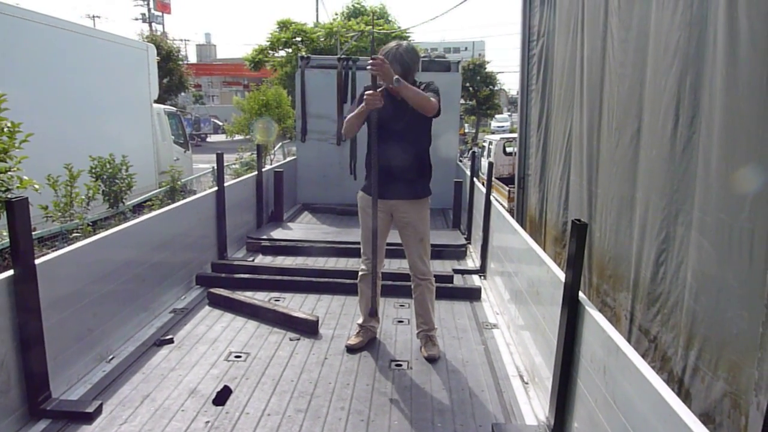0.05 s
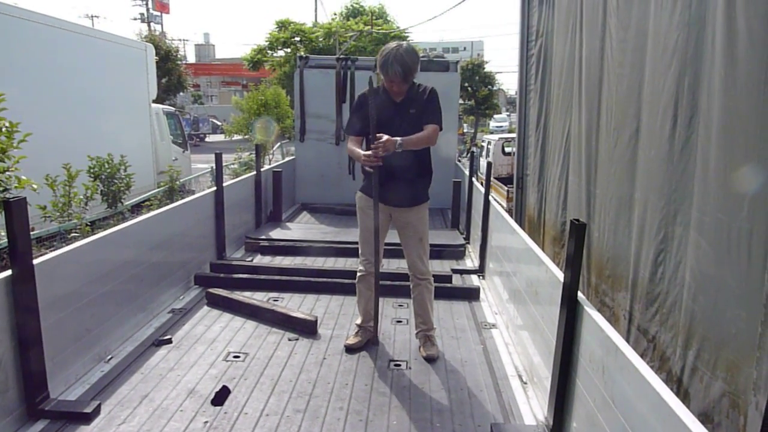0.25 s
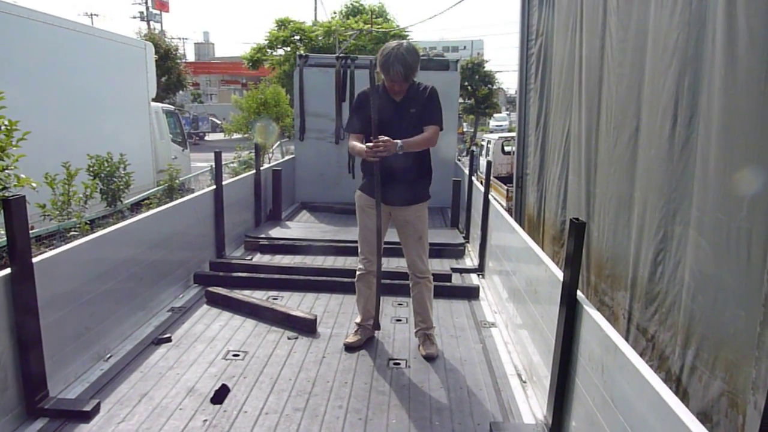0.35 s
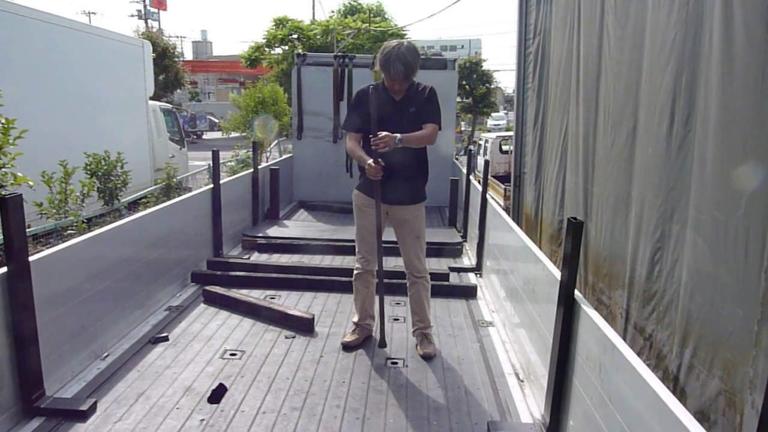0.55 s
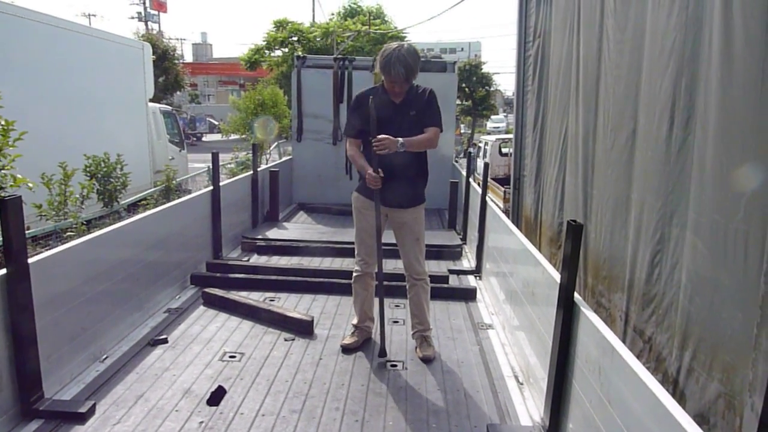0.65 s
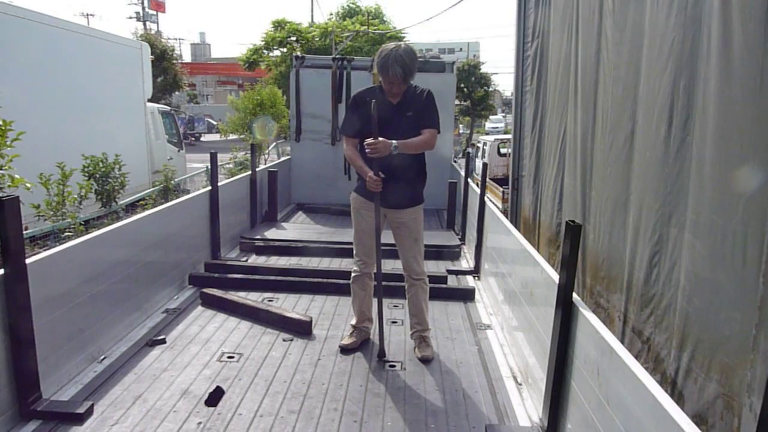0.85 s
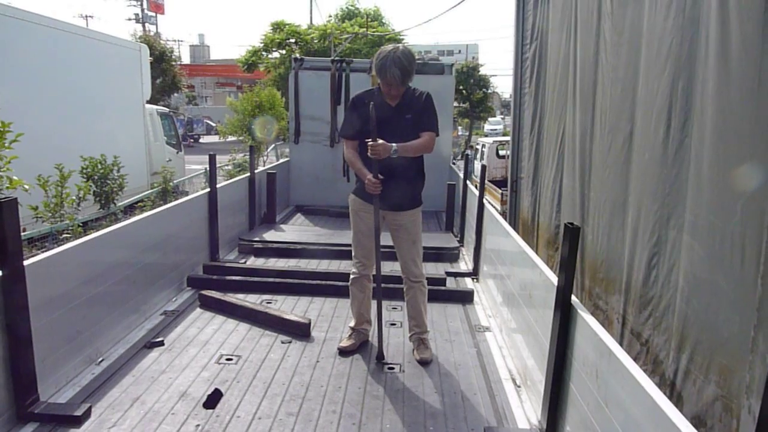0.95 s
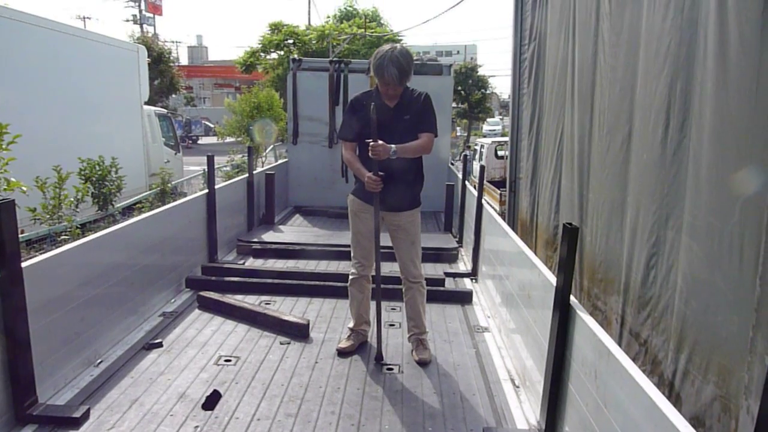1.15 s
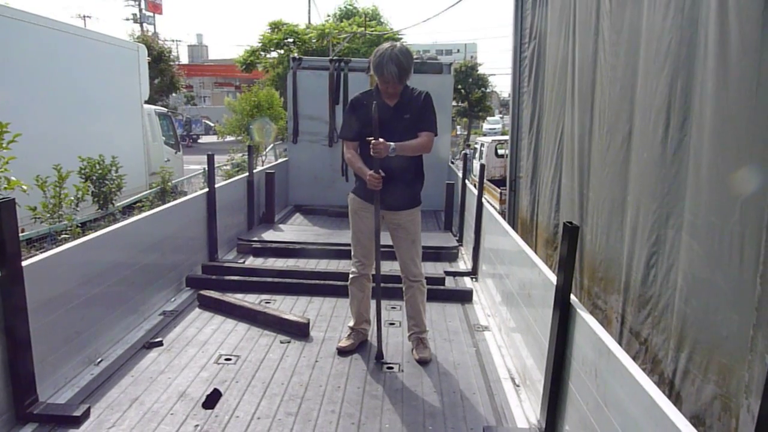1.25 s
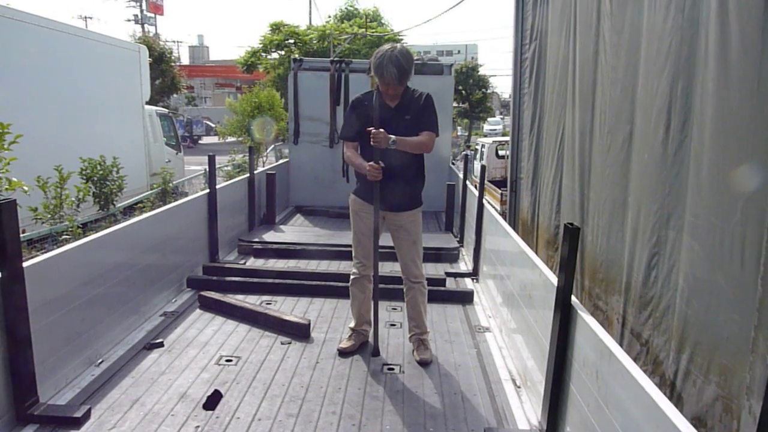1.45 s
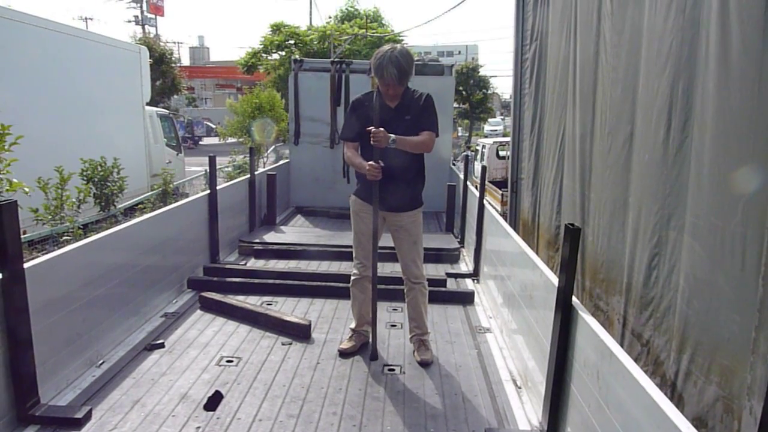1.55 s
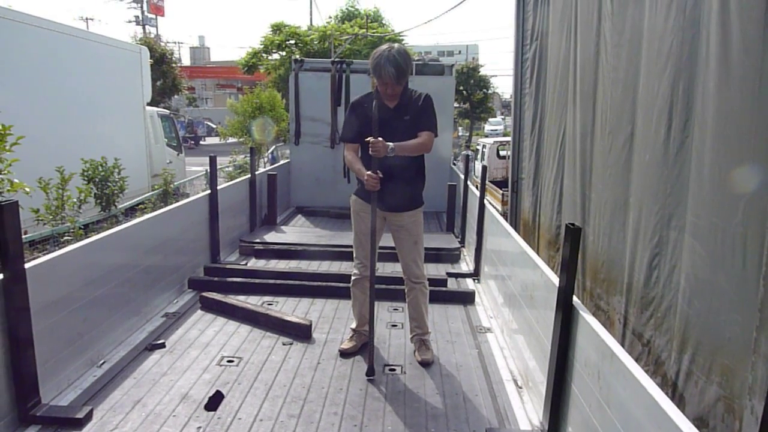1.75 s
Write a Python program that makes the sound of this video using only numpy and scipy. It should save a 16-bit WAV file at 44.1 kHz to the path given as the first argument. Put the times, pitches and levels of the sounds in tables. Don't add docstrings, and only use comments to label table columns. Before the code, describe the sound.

A steel bar is dropped on end onto an empty truck bed: a hard, booming clang, a heavier second hit, a lighter last touch, then short ringing over faint town hum outdoors, overloaded at the microphone.

```python
import sys
import numpy as np
from scipy import signal
from scipy.io import wavfile

SR = 44100
rng = np.random.default_rng(int(sys.argv[2]) if len(sys.argv) > 2 else 0)


def to_linear_factor(level_db):
    exponent = np.asarray(level_db, float) / 20
    return 10 ** exponent


def file_out(sig):
    cols = np.atleast_2d(sig).T
    lim = np.clip(cols, -1, 1)
    pcm = np.round(lim * 32767).astype(np.int16)
    wavfile.write(sys.argv[1], SR, pcm)


N = 79380
T_S = np.arange(N) / SR
LEFT_RIGHT_HALF = np.array([[0.5], [-0.5]])


def at_hz(points, hz):
    table_hz, value = np.array(points).T
    return np.interp(np.log(hz), np.log(table_hz), value)


def rms_one(x):
    return x / np.sqrt(np.mean(x ** 2) + 1e-20)


def drift(rate):
    r = np.exp(-80 * np.pi * rate / SR)
    noise = rng.standard_normal(N // 40 + 2002)
    slow = signal.lfilter([1], [1, -2 * r, r * r], noise)[2000:]
    return np.interp(np.arange(N) / 40, np.arange(len(slow)), rms_one(slow))


def ring(strike, hz, t60_s):
    r = to_linear_factor(-60 / (t60_s * SR))
    w = 2 * np.pi * hz / SR
    return signal.lfilter([0, np.sin(w)], [1, -2 * r * np.cos(w), r * r], strike + 1e-18)


def clicks(times_s, gains):
    out = np.zeros(np.shape(gains)[:-1] + (N,))
    out[..., (np.asarray(times_s) * SR).astype(int)] = gains
    return out


# (frequency [Hz], side over mid [dB])
SIDE_DB = [(60, -34), (100, -28.5), (180, -31), (310, -29.5), (530, -22), (910, -16), (1570, -8.5),
           (2700, -3), (4650, -3), (8010, 3.5)]
# (frequency [Hz], left over right [dB])
PAN = [(60, 1.5), (100, 1.0), (180, 1.0), (310, 1), (530, 0.5), (910, 1), (1570, 0.5), (2700, 0.5),
       (4650, 0.5), (8010, -2.5)]


def bands(spectrum, patchy_db, shape):
    out = 0
    together = drift(14)
    edges_hz = 25 * 2 ** np.arange(0, 8.7, 1 / 3)
    white = rng.standard_normal((2, 2, N + SR // 4))
    for k, (low, high) in enumerate(zip(edges_hz, edges_hz[1:])):
        band = signal.butter(2, [low, high], "band", fs=SR, output="sos")
        mid, side = signal.sosfilt(band, white[k % 2])[:, -N:]
        hz = np.sqrt(low * high)
        flicker_db = patchy_db * (0.5 * together + drift(12))
        gain = to_linear_factor(at_hz(spectrum, hz) + flicker_db) * shape(hz)
        both = mid + to_linear_factor(at_hz(SIDE_DB, hz)) * side * [[1], [-1]]
        out = out + gain * both * to_linear_factor(at_hz(PAN, hz) * LEFT_RIGHT_HALF)
    return out


# (frequency [Hz], density [dB per Hz])
TOWN = [(15, -48), (25, -4.5), (147, -1.5), (406, -6), (692, -12), (995, -15), (1400, -24), (6750, -39.5),
        (8200, -44), (10700, -84.5), (18000, -120)]
TOWN_DB, TOWN_PATCHY_DB = -42.5, 0.9
WHINE_HZ, WHINE_WANDER_HZ, WHINE_DB = 975, 1.9, -54


def town():
    whine_hz = WHINE_HZ + WHINE_WANDER_HZ * drift(8)
    whine = np.sin(2 * np.pi * np.cumsum(whine_hz) / SR) * to_linear_factor(2 * drift(12))
    hum = rms_one(bands(TOWN, TOWN_PATCHY_DB, lambda hz: 1))
    return to_linear_factor(TOWN_DB) * hum + to_linear_factor(WHINE_DB) * whine


# (time [s], thump [dB], knock [dB], deck roar [dB], roar tilt [dB per octave])
BLOWS = [
    (.2251, 4.5, 6.5, 4.5, 0.3),
    (0.6476, 8, -5, 6, -1.15),
    (.7925, 0, -5, 0.5, -2.15),
]
# (frequency [Hz], first blow [dB], later blows [dB], t60 [s])
THUMP = [(250, -1.7, 2, 0.045), (140, -32, -26, 0.042), (456.4, -22, -6, 0.11), (299, -4.5, -38, 0.1)]
CONTACT_S, SWING_S, FIRST_BULGE = 0.0003, 0.0016, 0.14


def thump():
    s, thump_db = np.transpose(BLOWS)[:2]
    r = np.exp(-1 / (CONTACT_S * SR))
    out = 0
    for hz, first_db, later_db, t60_s in THUMP:
        gain = to_linear_factor(thump_db + [first_db, later_db, later_db])
        push = clicks(s, FIRST_BULGE * gain) - clicks(s + SWING_S, gain)
        soft_push = signal.lfilter([(1 - r) ** 2], [1, -2 * r, r * r], push)
        out = out + ring(soft_push, hz, t60_s)
    return out


# (frequency [Hz], first blow [dB], later blows [dB], t60 [s])
KNOCK = [(837, -1.5, -10.5, 0.042), (1032, -3, -16.5, 0.048), (1814, -15.5, -3, 0.027),
         (2079, -12.5, -7, 0.082), (2885, -1, -3.5, 0.014), (3447, -7, -15.5, 0.023),
         (4530, -20, -23, 0.025), (6200, -31.5, -19.5, 0.015)]
TIP_S, KNOCK_SWAY_DB = 0.0021, 0.95


def knock():
    s, _, knock_db = np.transpose(BLOWS)[:3]
    sway = to_linear_factor(rng.normal(0, KNOCK_SWAY_DB, (len(KNOCK), 2, 1)))
    out = 0
    for gain, (hz, first_db, later_db, t60_s) in zip(sway, KNOCK):
        mode_db = np.array([first_db, later_db, later_db])
        strike = -clicks(s + TIP_S, to_linear_factor(knock_db + mode_db - 6))
        out = out + gain * ring(strike, hz, t60_s)
    return out


# (delay [s], level [dB])
ECHOES = [(.0047, -21), (.0098, -15), (.0125, -6)]


def impact():
    direct = thump() + knock()
    out = direct
    for k, (lag_s, db) in enumerate(ECHOES):
        echo = np.roll(direct, int(lag_s * SR), axis=1)
        out = out + to_linear_factor(db) * echo[::(-1) ** k]
    return out


# (frequency [Hz], density [dB per Hz])
ROAR = [(24, -46), (40, -9.5), (182, 1), (363, -1), (496, -7.5), (1260, -13.5), (5020, -31.5),
        (5370, -33.5), (8200, -45.5), (10700, -91.5), (18000, -120)]
# (frequency [Hz], t60 [s])
ROAR_T60 = [(60, 0.89), (200, 0.6), (600, 0.61), (1500, 0.53), (4000, 0.52), (8000, 0.55)]
ROAR_DB, ROAR_PATCHY_DB = 14, 1.6
ROAR_RISE_S, ROAR_RISE_CYCLES = 0.002, 1


def deck():
    def shape(hz):
        power = np.zeros(N)
        rise_s = ROAR_RISE_S + ROAR_RISE_CYCLES / hz
        for s, _, _, db, tilt_db in BLOWS:
            t = np.maximum(T_S - s - SWING_S, 0)
            fall_db = 60 * t / at_hz(ROAR_T60, hz)
            level = to_linear_factor(db + tilt_db * np.log2(hz / 250) - fall_db)
            power += (level * (1 - np.exp(-t / rise_s))) ** 2
        return np.sqrt(power)
    return to_linear_factor(ROAR_DB) * bands(ROAR, ROAR_PATCHY_DB, shape)


TWIN_DB, TWIN_T60_SHARE, RING_SPREAD_DB = -1.5, 0.88, 4


def ringing(pitches_hz, modes):
    out = np.zeros((2, N))
    s = np.transpose(BLOWS)[0] + TIP_S
    for hz, (*blows_db, t60_s, beat_hz) in zip(pitches_hz, modes):
        strike = clicks(s, to_linear_factor(blows_db))
        lean_db = at_hz(PAN, hz) + RING_SPREAD_DB * rng.normal(0, 1, 2)
        lean = to_linear_factor(lean_db * LEFT_RIGHT_HALF)
        main = ring(strike, hz, t60_s)
        twin = to_linear_factor(TWIN_DB) * ring(strike, hz + beat_hz, t60_s * TWIN_T60_SHARE)
        out += lean[:, :1] * main - lean[:, 1:] * twin
    return out


def damped(start_s, db_per_s):
    return to_linear_factor(-db_per_s * np.maximum(T_S - start_s, 0))


POSTS_HZ = [1798, 1895, 3666, 4186, 1486, 1357, 2126, 3370, 4560, 5264, 2658, 2837]
# (first blow [dB], second blow [dB], third touch [dB], t60 [s], beat [Hz])
POSTS = [(-48, -18, -22, 0.48, 3.6), (-42, -21.5, -21.5, .42, 4.4), (-46.5, -21.5, -25.5, 0.45, 3.2),
         (-38, -49, -20, 0.25, 2), (-36, -44, -44.5, 0.23, 2.2), (-45, -35.5, -46, 0.26, 4),
         (-40.5, -45, -44, 0.98, 3.7), (-41.5, -39, -30, 0.53, 3), (-45, -51.5, -65.5, 0.86, 2.6),
         (-25, -54, -64.5, .28, 2), (-50, -38, -54, 0.49, 4.8), (-49, -51, -62.5, 0.69, 3.5)]
REST_S, REST_DB_PER_S = 0.87, 40


def bed():
    return (deck() + ringing(POSTS_HZ, POSTS)) * damped(REST_S, REST_DB_PER_S)


BAR_HZ = [1776, 3539, 5277, 7108, 7192, 7990, 6304, 5852, 4759, 3943, 3141, 2207, 6015, 6546]
# (first blow [dB], second blow [dB], third touch [dB], t60 [s], beat [Hz])
BAR = [(-30, -30, -40, 0.85, 7.8), (-23, -40, -32, 1, 0.54), (-19.5, -46, -60, 0.68, 3.5),
       (-37, -52, -71, 0.72, 3), (-42, -56.5, -70, 0.75, 22), (-20, -62, -71, 0.79, 19),
       (-34, -67, -73, 0.75, 4.2), (-36.5, -43, -70.5, 0.83, 2.2), (-37, -26, -56.5, 0.51, 4.8),
       (-31, -52.5, -53, 0.72, 1.1), (-33.5, -38, -48.5, .38, 4.4), (-40.5, -15, -53, 0.52, 1),
       (-44.5, -54.5, -71, 0.41, 4), (-49.5, -79, -81, 0.42, 4)]
FADE_S, FADE_DB_PER_S = 1.13, 42


def bar():
    return ringing(BAR_HZ, BAR) * damped(FADE_S, FADE_DB_PER_S)


# (time [s], frequency [Hz], level [dB])
BIRD = [
    (1.385, 6680, -95),
    (1.405, 6850, -71),
    (1.44, 6800, -71),
    (1.462, 6350, -82),
    (1.475, 6400, -73),
    (1.49, 6250, -74),
    (1.5, 6200, -100),
]


def bird():
    s, hz, db = np.transpose(BIRD)
    level = to_linear_factor(np.interp(T_S, s, db, -200, -200) + 3)
    whistle = level * np.sin(2 * np.pi * np.cumsum(np.interp(T_S, s, hz)) / SR)
    return whistle * to_linear_factor(3 * LEFT_RIGHT_HALF)


def scene():
    return town() + impact() + bed() + bar() + bird()


def roll_off(x):
    return signal.sosfilt(signal.butter(12, 8610, fs=SR, output="sos"), x)


NOTCH_HZ, NOTCH_WIDTH_HZ, CUT_HZ, LOW_CUT_HZ = 5570, 370, 7370, 65.6
CEILING_DB, SENSE_S, ATTACK_S, RELEASE_DB_PER_S = -16, 0.0029, 0.0057, 65.5


def record(dry):
    b, a = signal.iirpeak(NOTCH_HZ, NOTCH_HZ / NOTCH_WIDTH_HZ, fs=SR)
    x = dry - signal.lfilter(b, a, dry)
    x = signal.sosfilt(signal.cheby1(8, 1, CUT_HZ, fs=SR, output="sos"), x)

    r = np.exp(-1 / (SENSE_S * SR))
    power = signal.lfilter([1 - r], [1, -r], np.mean(x ** 2, axis=0))
    over_db = np.maximum(10 * np.log10(power + 1e-12) - CEILING_DB, 0)
    climb_db = RELEASE_DB_PER_S * T_S
    duck_db = np.maximum.accumulate(over_db + climb_db) - climb_db
    r = np.exp(-1 / (ATTACK_S * SR))
    x = x * to_linear_factor(-signal.lfilter([1 - r], [1, -r], duck_db))

    x = signal.sosfilt(signal.butter(3, LOW_CUT_HZ, "high", fs=SR, output="sos"), x)
    return roll_off(np.clip(x, -1, 1))


dry = scene()
out = record(dry)
file_out(out)
```